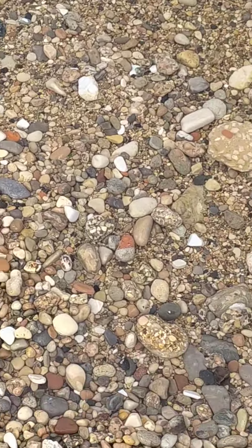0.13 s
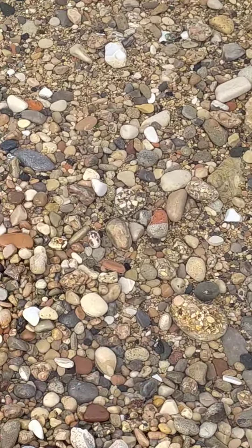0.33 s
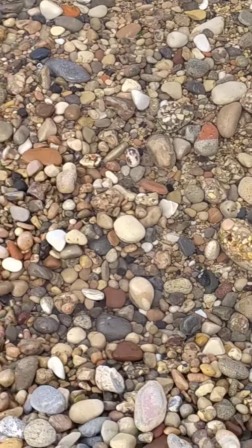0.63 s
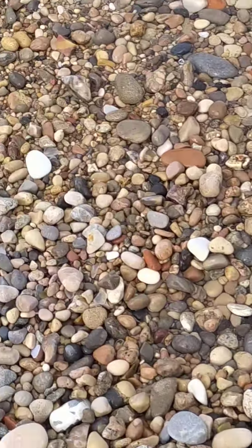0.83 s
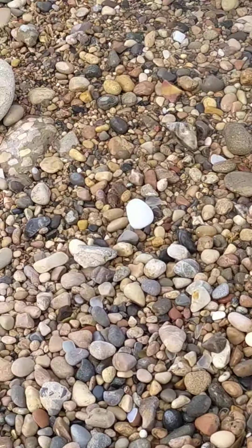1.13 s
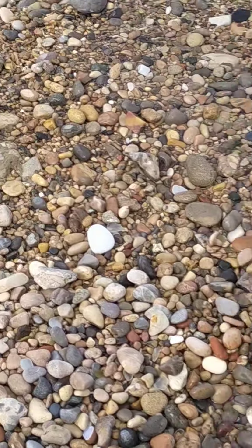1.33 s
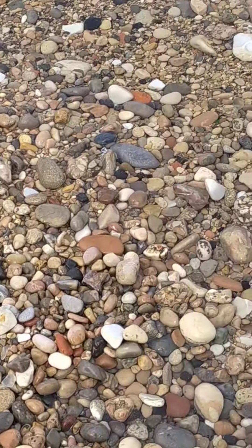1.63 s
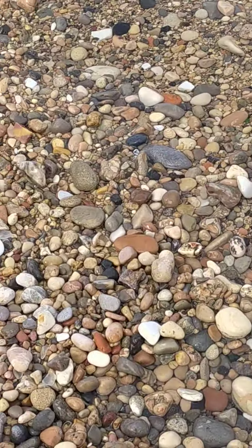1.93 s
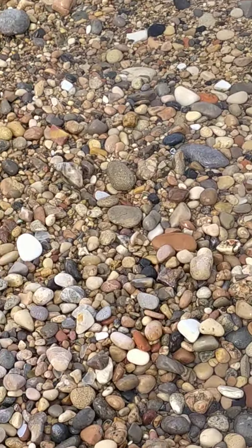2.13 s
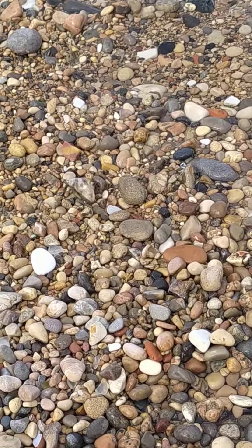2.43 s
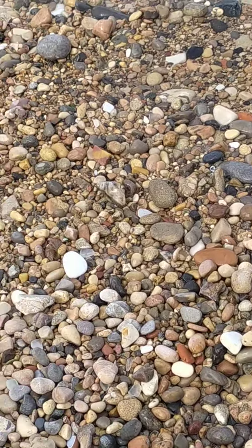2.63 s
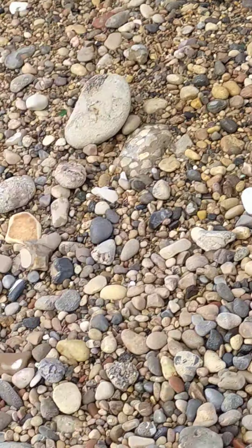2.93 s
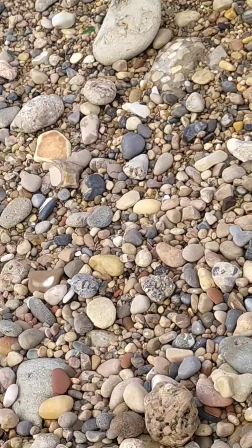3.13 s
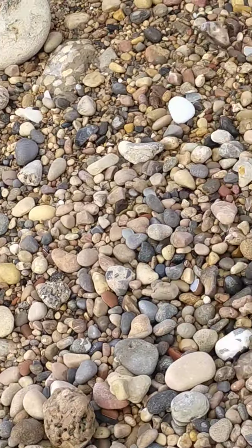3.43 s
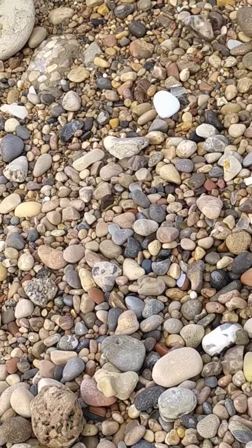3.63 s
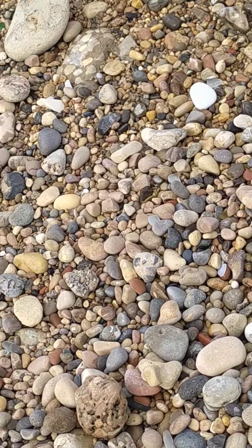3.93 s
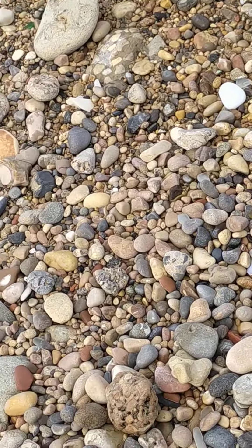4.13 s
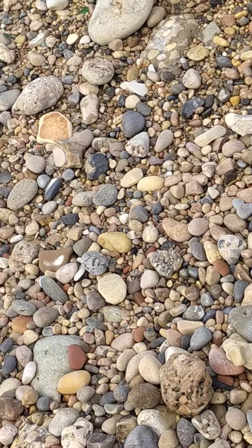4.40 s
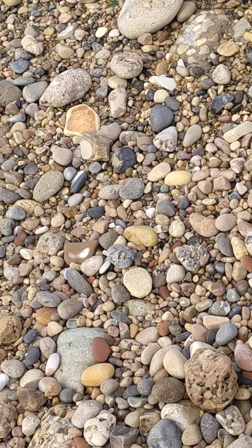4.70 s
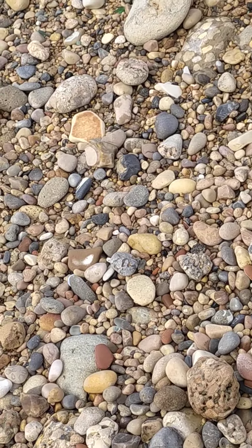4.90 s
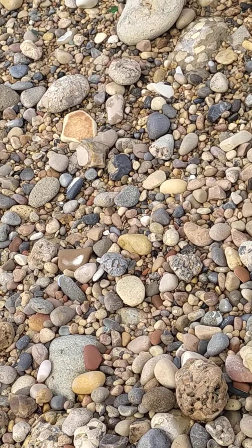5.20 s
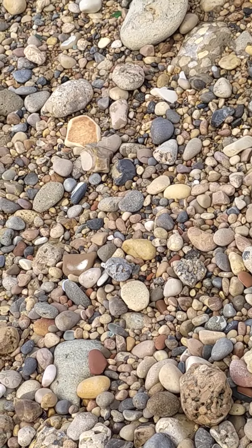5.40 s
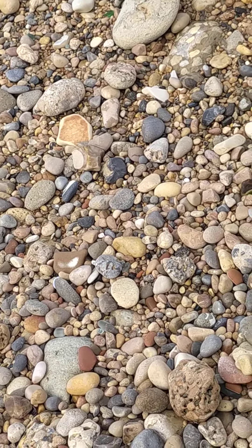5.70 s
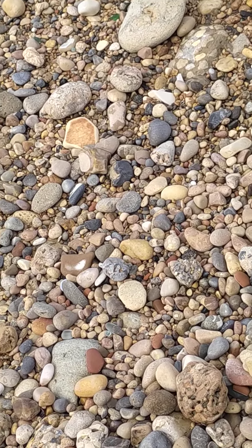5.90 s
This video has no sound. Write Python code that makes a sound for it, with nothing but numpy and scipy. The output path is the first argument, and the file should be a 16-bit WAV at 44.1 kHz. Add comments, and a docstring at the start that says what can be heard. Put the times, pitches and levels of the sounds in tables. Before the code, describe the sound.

On an open pebble beach, small wavelets slap and gurgle softly to the left while a few pebbles tick. Then a slow step crunches hard through loose stones, followed by a second with hollow knocks and scattering pebbles. Water plops quietly again before another short crunch and a faint last shuffle. Close, dry stereo pickup with a low airy rumble behind.

```python
"""Pebbles large and small clack and tick on a beach, through three slow steps and a few shuffles.
Fine gravel crunches under the shoe as crowds of tiny contacts, and big stones knock with a hollow ring.
Wavelets lap and fizz a little to the left: ringing bubbles, foam pops and short splashes of noise.
Behind them lie a low rumble of open air and water (filtered noise) and one faint gliding cry."""
import sys
import numpy as np
from scipy import signal
from scipy.fft import rfft, irfft, next_fast_len
from scipy.io import wavfile
from scipy.ndimage import uniform_filter1d

SR = 44100
rng = np.random.default_rng(int(sys.argv[2]) if len(sys.argv) > 2 else 0)


def master(y):
    """Save y as 16-bit WAV."""
    cut = np.clip(np.atleast_2d(y).T, -1, 1)
    pcm = np.round(cut * 32767)  # scale
    wavfile.write(sys.argv[1], SR, pcm.astype(np.int16))


N = 266981

# tone colour of water rocking in deep hollows: pitch_hz [Hz], density_db [relative dB per Hz]
SLOSH_COLOUR = [(90, -21), (135, -19), (170, 1.5), (215, -3.5), (300, 0.5), (500, 3.5), (750, -5),
                (1200, -41), (3000, -69)]


def from_db(db):
    """Turn decibels into a gain."""
    return 10 ** (np.asarray(db) / 20)


def rms_one(x):
    """Scale to an rms (average strength) of 1."""
    return x / np.sqrt(np.mean(x ** 2) + 1e-20)


def in_time(rows):
    """Read each column of a time curve at every sample, with straight lines between its points."""
    s, *columns = np.transpose(rows)
    return [np.interp(np.arange(N) / SR, s, column) for column in columns]


def at_hz(points, hz):
    """Read a spectrum on a log-frequency axis."""
    known_hz, values = np.transpose(points)
    return np.interp(np.log(np.maximum(hz, 1)), np.log(known_hz), values)


def panned(left_db):
    """Gains of the two channels, left minus right in dB, with a mean power of 1."""
    return rms_one(from_db([[left_db / 2], [-left_db / 2]]))


def colour(x, spectrum, extra_db=lambda hz: 0):
    """Filter with the given spectrum, without any ringing ahead of the sound (minimum phase)."""
    size = next_fast_len(x.shape[-1])
    size += size % 2
    hz = np.arange(size // 2 + 1) * SR / size
    cepstrum = irfft(np.log(from_db(at_hz(spectrum, hz) + extra_db(hz))))
    # fold the second half onto the first, so that the filter only looks back
    cepstrum[1:size // 2] *= 2
    cepstrum[size // 2 + 1:] = 0
    response = np.exp(rfft(cepstrum))
    return irfft(rfft(x, size) * response)[..., :x.shape[-1]]


def evened(x, window_s):
    """Hold the running level near 1, leaving grains shorter than the window their shape."""
    power = uniform_filter1d(np.mean(x ** 2, axis=0), max(int(window_s * SR), 2))
    return x / np.sqrt(np.maximum(power, 0) + np.mean(power) / 1000)


def add(out, s, sound):
    """Mix a sound in at time s."""
    i = int(np.clip(round(s * SR), 0, N - 1))
    out[:, i:i + sound.shape[1]] += sound[:, :N - i]


def grains(per_s, spread_db, shapes):
    """Random arrivals of random size, each with one of the given shapes."""
    out = np.zeros((2, N))
    at = np.flatnonzero(rng.random(N) < per_s / SR)
    sizes_db = spread_db * np.minimum(rng.exponential(1, len(at)), 4)
    sizes = from_db(sizes_db) * rng.choice([-1, 1], len(at))
    for i, size, k in zip(at, sizes, rng.integers(0, len(shapes), len(at))):
        add(out, i / SR, size * shapes[k])
    return out


def peak(hz, centre_hz, width_hz):
    """Bell of height 1 around a resonance."""
    return 1 / (1 + ((hz - centre_hz) / width_hz) ** 2)


def lows_share(hz, corner_hz=6000):
    """The part of the spectrum, below the corner, that grows with the size of a stone."""
    return 1 / (1 + (hz / corner_hz) ** 8)


def bubble(hz, cycles=4.0, rise=0.13, lag_s=0.00037):
    """A pocket of air rings for a few cycles (in water it rises in pitch); the right side hears it later."""
    right_lag_s = lag_s * rng.uniform(.6, 1.4)
    t = np.maximum(np.arange(2048) / SR - np.array([[0], [right_lag_s]]), 0)
    age = t * hz / cycles
    return np.sin(2 * np.pi * hz * t * (1 + rise * np.tanh(age / 2))) * np.exp(-age)


def contact(lag_s, attack_s=.0001, hold_s=.0004, ring_s=.0007, tail_db=-14.0, tail_s=0.0022,
            rebound_db=-11.5, alike=0.53):
    """A stone bites, cracks and rebounds; its neighbours scatter each crack into a short, dying burst."""
    t = np.arange(1024) / SR
    shared, own = rng.standard_normal((2, 2, len(t)))
    scatter = np.sqrt(alike) * shared[0] + np.sqrt(1 - alike) * own
    crack = np.exp(-np.maximum(t - hold_s * rng.uniform(0.41, 1.7), 0) / ring_s)
    rebound_gain = from_db(rebound_db + rng.normal(0, 6.0))
    rebound = rebound_gain * np.interp(t - rng.uniform(0.0023, 0.0049), t, crack, left=0)
    tail = from_db(tail_db) * np.exp(-t / tail_s)
    bite = np.minimum(t / attack_s, 1) ** 2
    sound = scatter * bite * np.sqrt(crack ** 2 + rebound ** 2 + tail ** 2)
    # a stone on the left reaches the right side lag_s later; each lies at a slightly different angle
    lag = int(round((lag_s + rng.normal(0, .00004)) * SR))
    late = int(lag > 0)
    sound[late] = np.pad(sound[late], (abs(lag), 0))[:len(t)]
    return sound


def clack(bulk_db, sharp_db, ring_hz, left_db, edge_hz=11300, stone_ring_db=7.5, lag_s_per_db=.00003):
    """A dry clack, coloured by stone bulk, contact hardness, the gap between stones and their brief ringing."""
    # an average clack: pitch_hz [Hz], density_db [relative dB per Hz]
    stone_colour = [(300, -44.5), (700, -23), (1200, -23), (1800, -20), (2400, -15), (2900, -17.5),
                    (3400, -17), (4200, -14), (5000, -12.5), (6800, -3.5), (8000, -2.5), (9300, 2),
                    (10300, -1.5), (11800, -10.5), (14000, -15), (16000, -25.5)]
    burst = contact(lag_s_per_db * left_db, attack_s=.0012, hold_s=.0012, ring_s=0.00067,
                    tail_db=-14.5, rebound_db=-15.0)
    stones_hz = rng.uniform(2500, 11984, size=8)

    def character_db(hz):
        """Change the average colour for these stones."""
        bulk = bulk_db * lows_share(hz)
        hardness = sharp_db * (1 - lows_share(hz, edge_hz))
        gap_ring = 7 * peak(hz, ring_hz, width_hz=450)
        stone_rings = np.max([peak(hz, stone_hz, width_hz=110) for stone_hz in stones_hz], axis=0)
        return bulk + hardness + gap_ring + stone_ring_db * stone_rings

    sound = colour(burst, stone_colour, character_db)
    # give each side the energy of 2 ms at rms 1
    energy = np.sum(sound ** 2, axis=1, keepdims=True)
    return panned(left_db) * sound / np.sqrt(energy / (SR / 500))


def open_air(level_db=-54.0):
    """Steady rumble of air and water, alike on both sides in the bass."""
    # pitch_hz [Hz], left_right_likeness [-1 opposite to 1 the same]
    likeness = [(30, 0.73), (150, 0.97), (300, 0.8), (600, 0.82), (1200, -0.38), (3000, -0.19),
                (15000, -0.86)]
    # pitch_hz [Hz], density_db [relative dB per Hz]
    rumble_colour = [(12, -14.5), (25, 3), (60, -0.5), (90, -5.5), (120, -9), (165, -5.5), (260, -10.5),
                     (500, -16), (1000, -13), (2200, -23.5), (3500, -30.5), (6000, -45), (9500, -51),
                     (12500, -51)]
    mid, side = rfft(rng.standard_normal((2, 2 * N)))
    alike = np.clip(at_hz(likeness, np.arange(N + 1) * SR / (2 * N)), -1, 1)
    pair = irfft(np.sqrt(1 + alike) * mid + np.sqrt(1 - alike) * side * [[1], [-1]])[:, :N]
    return from_db(level_db) * rms_one(colour(pair, rumble_colour))


def gull():
    """One faint falling cry, perhaps a far gull: a thin, pure tone that glides."""
    # time_s [s], pitch_hz [Hz], level_db [dB, rms]
    cry = [(1.98, 1430, -71), (2.07, 1377, -64), (2.13, 1260, -77), (2.2, 1146, -56), (2.25, 1026, -80)]
    hz, db = in_time(cry)
    t = np.arange(N) / SR
    calling = (t > cry[0][0]) & (t < cry[-1][0])
    return np.sqrt(2) * from_db(db) * calling * np.sin(2 * np.pi * np.cumsum(hz) / SR)


def surges(rise_s=0.015, fall_s=0.039):
    """Most wavelets lift the water's level quickly and drain more slowly; one brings a slight dip; in dB."""
    # wavelets running up the stones: centre_s [s], surge_db [dB, below 0 for a dip]
    run_ups = [(0.65, 1), (0.932, 7), (1.091, 8.5), (1.317, 3), (1.43, 3), (1.759, 3), (2.86, 7.5),
               (4.29, -1), (4.74, 1.5)]
    t = np.arange(N) / SR
    return sum(db * np.exp(-((t - s) / np.where(t < s, rise_s, fall_s)) ** 2) for s, db in run_ups)


def wavelets(lap_gain_db=-2.5, drip_db=-3.5, surge_slosh_share=0.62):
    """Water moves among the stones: big pockets gulp, bubbles ring, and foam fizzes as pops and hiss."""
    # slow wash: time_s [s], bubbling_db [dB before the lap gain and surges], foam_db [dB before surges]
    wash = [(0.0, -56, -49.5), (0.055, -47.5, -42.5), (0.13, -46.5, -42.5), (0.155, -52, -54),
            (0.25, -61, -60), (0.42, -58, -55), (0.8, -50.5, -46), (1.02, -50.5, -51.5),
            (1.5, -47.5, -52.5), (1.97, -53.5, -56.5), (2.85, -50, -54), (3.0, -54.5, -58),
            (3.4, -53.5, -51), (3.72, -57, -65.5), (3.82, -56.5, -56), (4.3, -50.5, -53.5),
            (4.58, -56, -65), (4.78, -52, -50), (5.2, -63.5, -69.5), (5.58, -61.5, -72.5), (5.7, -58, -58),
            (5.8, -62.5, -55), (5.87, -63, -63.5), (6.05, -56, -59)]
    # water rocking in the deep hollows: time_s [s], level_db [dB before surges]
    sloshing = [(0.1, -54), (0.35, -60), (0.65, -60), (0.9, -54), (1.03, -57), (1.25, -57), (1.9, -59.5),
                (2.4, -55.5), (2.9, -60), (3.5, -67.5), (4.0, -66), (4.3, -58.5), (4.55, -64.5),
                (4.75, -56), (5.1, -61), (6.05, -66.5)]
    # colours of bubbling and of foam: pitch_hz [Hz], density_db [relative dB per Hz]
    lap_colour = [(300, -3.5), (700, -6), (1000, -7), (1300, 3.5), (1900, 2), (2600, 0), (3400, -11),
                  (5000, -11), (9000, -33)]
    fizz_colour = [(1500, -6), (3500, -5), (5000, -5.5), (7000, -2), (9400, 3.5), (10500, 1), (12000, -12),
                   (16000, -21.5)]
    wash_db, foam_db = in_time(wash)
    surge_db = surges()
    lap_db, fizz_db = wash_db + surge_db, foam_db + surge_db
    slosh_db = in_time(sloshing)[0] + surge_slosh_share * surge_db

    pockets = grains(900, 4.35, [bubble(hz, cycles=1.9) for hz in np.geomspace(140, 900, 40)])
    slosh = from_db(slosh_db) * evened(colour(pockets, SLOSH_COLOUR), 0.034) * panned(1.0)

    ringing = [bubble(hz, cycles=4.2) * np.sqrt(hz) for hz in np.geomspace(600, 5000, 80)]
    bubbles = grains(1400, 1.9, ringing)
    lap = from_db(lap_db + lap_gain_db) * evened(colour(bubbles, lap_colour), 0.13) * panned(4.7)

    pops = [contact(0.00034, ring_s=0.00098) for _ in range(40)]
    foam = rms_one(grains(3500, 6.6, pops))
    drips = from_db(drip_db) * rms_one(grains(70, 1.2, pops))
    hiss = rng.standard_normal((2, N))
    spray = foam + drips + hiss
    fizz = from_db(fizz_db) * evened(colour(spray, fizz_colour), 0.068) * panned(4.5)
    return slosh + lap + fizz


def slaps(splash_db=1.5, gulp_gain_db=3.0, churn_db=-5.5, splash_s=0.0044, churn_s=0.0028, churn_top_hz=600):
    """A wavelet closes on a gap: a short splash, one ringing bubble and the hollow's low, churning gulp."""
    # water slapping into gaps: start_s [s], level_db [dB before splash gain and panning],
    # bubble_hz [Hz], gulp_db [dB before the gulp gain], gulp_hz [Hz]
    gap_slaps = [(0.649, -38.5, 920, -41, 367), (0.6532, -32, 2360, -40, 292), (0.745, -39, 1130, -50, 190),
                 (0.785, -44, 1700, -51, 450), (0.877, -46, 1600, -57, 550), (0.8214, -45, 1900, -43, 430),
                 (0.9213, -32.5, 2600, -53, 480), (0.9286, -38.5, 1970, -44, 560),
                 (0.9608, -40, 1940, -39, 590), (0.967, -49, 910, -36.5, 474), (1.074, -36, 1380, -35, 514),
                 (1.095, -41, 2280, -57, 450), (1.1236, -37, 1970, -39, 497), (1.201, -44, 1540, -45, 450),
                 (1.285, -41.5, 2000, -54, 447), (1.311, -42, 1260, -56, 400),
                 (1.3208, -37, 1640, -51, 400), (1.326, -47, 1700, -59, 400), (1.34, -44, 1920, -58, 500),
                 (1.4, -44, 1750, -62, 452), (1.447, -40, 1300, -49, 450), (1.4201, -37.5, 1500, -44, 352),
                 (1.4733, -37, 1320, -60, 450), (1.769, -33.5, 1295, -48, 456),
                 (2.1168, -35, 1280, -62, 400), (3.891, -43.5, 1360, -56, 258),
                 (4.0123, -39.5, 1590, -62, 596), (4.0919, -35, 1660, -48, 623),
                 (4.1888, -33.5, 1660, -52, 785), (4.2168, -38, 1450, -49, 550),
                 (4.2442, -41, 1160, -34.5, 724), (4.274, -39.5, 1770, -43.5, 392),
                 (4.2936, -32, 1750, -40, 547), (4.306, -34.5, 1875, -40.5, 513),
                 (4.3936, -34.5, 2620, -46, 757), (4.566, -36.5, 1493, -55, 452)]
    # splash: pitch_hz [Hz], density_db [relative dB per Hz]
    splash_colour = [(300, -9), (600, 5), (900, -2.5), (1400, 4.5), (1900, 5.5), (2600, -1), (3500, -9),
                     (5000, -6.5), (9000, -2.5), (14000, -33)]
    out = np.zeros((2, N))
    for s, db, hz, low_db, gulp_hz in gap_slaps:
        plip = bubble(hz, cycles=9.0, rise=0.0079)
        t = np.arange(plip.shape[1]) / SR
        noise = rng.standard_normal((3, len(t)))
        swell = (1 - np.exp(-t / 0.0006)) * (1 - t / t[-1])
        splash = rms_one(colour(noise[:2], splash_colour)) * swell * np.exp(-t / splash_s)
        low_pass = signal.butter(4, churn_top_hz, fs=SR, output="sos")
        churn = rms_one(signal.sosfilt(low_pass, colour(noise[2], SLOSH_COLOUR))) * np.exp(-t / churn_s)
        gulp = swell * (bubble(gulp_hz, cycles=1.9, rise=0.081) + from_db(churn_db) * churn)
        slap = from_db(db) * (from_db(splash_db) * splash + plip) * panned(5.5)
        add(out, s, slap + from_db(low_db + gulp_gain_db) * gulp)
    return out


def backwash(per_s=32, left_db=5.5):
    """Tiny stones tick against each other as the water drains between them."""
    # draining water rolls loose grit: start_s [s], length_s [s], tick_db [dB]
    drains = [(0.176, 0.64, -54.5), (1.454, 0.42, -39), (3.83, .6, -44.5)]
    out = np.zeros((2, N))
    for s, length_s, db in drains:
        for share, pitch in rng.random((int(per_s * length_s), 2)):
            tick = clack(0, 0, 7000 + 4000 * pitch, left_db)
            add(out, s + share * length_s, from_db(db) * tick)
    return out


def pressure(release_db_per_s, attack_s=.022, sag_db_per_s=25):
    """Load, bulk and knock in dB: each press builds quickly, sags as the stones lock, and lets go."""
    # the shoe presses or scuffs: full_load_s [s], length_s [s], level_db [dB before sag and release],
    # bulk_db [dB of extra lows as bigger stones move], knock_db [dB of big stones rocking underneath]
    presses = [(0.055, 0.049, -46.5, 2, -9), (2.093, 0.032, -40.5, 9, -13.5), (2.227, 0.048, -34.5, 5, -31),
               (2.31, 0.12, -26.5, 2, -33), (2.52, 0.0037, -32.5, 7.5, -35), (2.55, 0.027, -30, 3.5, -45),
               (2.677, 0.12, -41.5, 1, -13), (2.77, 0.0035, -36, 2, -25), (3.04, 0.015, -42, 9.5, -15),
               (3.071, 0.069, -27.5, 5.5, -15.5), (3.16, 0.056, -30.5, 5.5, -12.5),
               (3.237, 0.034, -32, 4, -14), (3.306, 0.018, -45, 12, -20), (3.373, 0.026, -47.5, 10.5, -13),
               (3.57, 0.11, -52, 11, -15), (4.6, 0.015, -51, 7, -25), (4.798, 0.046, -35, 6.5, -30),
               (4.889, 0.043, -33, 3, -28), (4.969, 0.015, -37, 7, -33), (5.62, 0.012, -51, 6, -26),
               (5.684, 0.012, -42, 7, -21), (5.744, 0.065, -38.5, 6, -22), (5.916, 0.01, -49.5, 7.5, -26)]
    t = np.arange(N) / SR
    loads = []
    for s, length_s, db, *_ in presses:
        sag_db = sag_db_per_s * np.clip(t - s, 0, length_s)
        release_db = release_db_per_s * np.clip(t - s - length_s, 0, 2)
        build_up = np.clip(1 + (t - s) / attack_s, 0, 1) ** 2
        loads.append(from_db(db - sag_db - release_db) * build_up)
    loads = np.array(loads) + 1e-9
    # presses that overlap share bulk and knock by their load
    bulk_db, knock_db = np.transpose(presses)[3:] @ loads / loads.sum(axis=0)
    return 20 * np.log10(loads.max(axis=0)), bulk_db, knock_db


# how fast the shoe lets go of the bed
PRESS_RELEASE_DB_PER_S = 280


def gravel(lows_db=-9.5, rest_db=-70.0, slip_db=5.5, slips_per_s=120, ring_db=25.0, split_hz=5800):
    """Small stones slip in crowds: the harder the shoe presses, the more contacts a second."""
    # where the moving shoe is: time_s [s], left_db [dB, left minus right]
    shoe_place = [(0, -11), (2.3, 3), (2.8, -0.5), (3.1, 1), (4.8, 1), (5.7, 2)]
    # fine stones: pitch_hz [Hz], density_db [relative dB per Hz]
    grit_colour = [(300, -38), (700, -10), (1300, -30), (2300, -7.5), (3000, -7), (5000, 6), (6800, -3.5),
                   (8000, -1), (9300, 1), (10300, -3), (11800, -11), (14000, -20.5), (16000, -45.5)]
    db, bulk_db, knock_db = pressure(PRESS_RELEASE_DB_PER_S)
    left_db, = in_time(shoe_place)
    per_s = 2000 * from_db(.35 * (db + 30)) + 150
    stones = []
    for ring_hz in np.geomspace(1900, 14500, 90):
        touch = contact(rng.uniform(-0.000088, .00024), hold_s=.00005, ring_s=0.000074,
                        tail_db=-42.0, rebound_db=-12.0)
        ringing = colour(touch, grit_colour, lambda hz: ring_db * peak(hz, ring_hz, width_hz=69))
        stones.append(ringing * panned(rng.normal(0, 5.0)))
    # the bed sticks and slips, so the contacts swell and fade in clumps
    slips = np.interp(np.arange(N) / SR * slips_per_s, np.arange(N), rng.standard_normal(N))
    crunch = grains(per_s, 1.3, stones) * from_db(slip_db * slips)
    lows = signal.sosfilt(signal.butter(6, split_hz, fs=SR, output="sos"), crunch)
    highs = signal.sosfilt(signal.butter(6, split_hz, "high", fs=SR, output="sos"), crunch)
    # under too light a load the stones lie still
    moving = np.maximum(from_db(db) - from_db(rest_db), 0)
    sides = from_db(np.array([left_db, -left_db]) / 2)
    # the biggest stones rock underneath and set the hollows between them ringing
    hollows = [bubble(hz, cycles=4.0, rise=0, lag_s=.00008) * np.sqrt(hz) for hz in np.geomspace(880, 2600, 36)]
    knocks = from_db(knock_db) * evened(grains(1600, 1.5, hollows), 0.011)
    bulk = from_db(bulk_db + lows_db) * evened(lows, 0.019)
    return moving * sides * (evened(highs, 0.018) + bulk + knocks)


def settling(per_s=45, level_db=-5.5, spread_db=4.0, bulk_db=6.5, sharp_db=-20.0, left_db=1.5, rest_db=-51.5,
             settle_db_per_s=42.5, after_press_drop_db=10):
    """Smaller pebbles topple at random during each press, and ever more softly after it."""
    out = np.zeros((2, N))
    lingering_db = pressure(settle_db_per_s)[0]
    pressed_db = pressure(PRESS_RELEASE_DB_PER_S)[0]
    # once the shoe lets go, the slower and softer stir takes over
    stir_db = np.maximum(pressed_db, lingering_db - after_press_drop_db)
    for i in np.flatnonzero((rng.random(N) < per_s / SR) & (stir_db > rest_db)):
        size, bulk, sharp, side = rng.standard_normal(4)
        ring_hz = rng.uniform(3500, 10500)
        sound = clack(bulk_db + 6 * bulk, sharp_db + 6 * sharp, ring_hz, left_db + 3 * side)
        add(out, i / SR, from_db(stir_db[i] + level_db + spread_db * size) * sound)
    return out


def cobbles(ring_s=0.0044, neighbours_db=-11.5, neighbour_cycles=2.5):
    """Big stones knock under the heel; one hollow rings clearly and a few others briefly."""
    # start_s [s], level_db [dB of the main ring], ring_hz [Hz]
    heel_knocks = [(3.076, -33, 1972), (3.106, -36, 2800), (3.13, -29.5, 1848), (3.147, -34, 2150),
                   (3.168, -30, 2020), (3.172, -27.5, 1340), (3.199, -32, 1900), (3.204, -22.5, 3400),
                   (3.214, -30.5, 1920), (3.243, -37, 3200), (3.28, -33, 3390), (4.785, -27.5, 2470)]
    out = np.zeros((2, N))
    for s, db, hz in heel_knocks:
        hollow = bubble(hz, cycles=hz * ring_s, rise=0, lag_s=.00005)
        others = sum(bubble(other_hz, cycles=neighbour_cycles, rise=0, lag_s=.00007) * rng.choice([-1, 1])
                     for other_hz in rng.uniform(780, 3360, size=3))
        add(out, s, from_db(db) * (hollow + from_db(neighbours_db) * others))
    return out


def pebbles(level_db=-3.5, usual_lows_db=-21, usual_top_db=-24.5, delay_s=.0003,
            rebound_s=0.0066, rebound_spread_s=0.017, rebound_db=-20):
    """Pebbles large and small clack or tick, shoved by the shoe, dropping back or rolled by draining water."""
    # the clearest strikes: strike_s [s, before the short delay], strike_db [dB before the overall level],
    # lows_db and top_db [dB, set against the usual pebble], gap_ring_hz [Hz], left_db [dB, left minus right]
    strikes = [(0.06, -22, -38, -20, 8450, 4), (0.1765, -33.5, -43, -15, 8640, 2.5),
               (0.255, -40.5, -24, -22, 9000, 6.5), (0.3187, -42.5, -18, -28, 7000, 1),
               (0.5213, -34, -20, -20, 9200, 5.5), (0.6175, -32.5, -27, -17, 9000, 4.5),
               (0.916, -26.5, -30, -18, 9100, 13.5), (0.931, -29, -22, -22, 9200, 5.5),
               (1.071, -29, -6, -20, 7000, 6), (1.084, -34, -16, -24, 9000, 5),
               (1.446, -39, -16, -18, 9600, 7), (1.502, -36, -35, -20, 9280, 8),
               (1.569, -34.5, -7, -29, 9750, 4.5), (2.0352, -32, -18, -2, 10100, 8),
               (2.0913, -24.5, -12, -25, 9500, 2.5), (2.153, -25, -16, -20, 10400, 4.5),
               (2.2032, -21, -11, -35, 8800, 4.5), (2.228, -23, -29, -24, 9000, 3.5),
               (2.2336, -19.5, -37, -33, 8300, 1.5), (2.245, -19, -37, -33, 9300, 7),
               (2.254, -18.5, -30, -30, 8400, 3.5), (2.269, -21, -21, -28, 9300, 4),
               (2.2879, -16.5, -13.5, -27, 9300, 1), (2.314, -21, -29, -10, 9200, 1),
               (2.3215, -19, -24, -18, 10000, 2), (2.328, -21, -25, -21, 9200, 3),
               (2.335, -16, -18, -4, 8900, 6), (2.358, -15.5, -42, -12, 10300, 5),
               (2.376, -17, -38, -7, 10300, 1.5), (2.39, -16.5, -37, -13, 9690, 4.5),
               (2.4084, -15.5, -46, -13, 9500, 2.5), (2.432, -19.5, -40, -15, 10200, 5),
               (2.456, -16.5, -26, -39, 10400, 1.5), (2.487, -30, -17, -30, 9000, 2),
               (2.5065, -14.5, -38, -15, 8900, 12), (2.514, -16, -20, -16, 8890, 2.5),
               (2.5223, -16.5, -16.5, -13, 9640, 1), (2.527, -18, -15, -26, 9500, 9),
               (2.551, -12, -21, -32, 9900, 5.5), (2.563, -14.5, -29, -27, 9510, 6),
               (2.5723, -15, -42, -22, 9400, 3.5), (2.588, -25, -23, -28, 8740, 4),
               (2.596, -9.5, -24, -24, 8770, 6.5), (2.6045, -20, -36, -24, 6500, -3),
               (2.6125, -39, -34, -28, 9000, -8), (2.638, -13.5, -23.5, -30, 8610, 3.5),
               (2.6408, -21, -19, -28, 10400, 3), (2.6815, -14, -15.5, -19, 8600, 3.5),
               (2.691, -18.5, -14, -18, 9200, 4.5), (2.729, -18, -6, -20, 8490, 3),
               (2.747, -25.5, -8, -33, 5230, 1), (2.755, -32, -25, -34, 8960, 3),
               (2.7732, -15, -21.5, -37, 8680, 5.5), (2.856, -21, -32, -21, 9900, 6),
               (2.9792, -29.5, -11, -17, 9200, -0.5), (3.038, -27, -17, -38, 9000, -2),
               (3.057, -27, -11, -30, 8410, 2), (3.0756, -16.5, -15.5, -45, 8784, -0.5),
               (3.0818, -13, -19.5, -42, 9070, 0.5), (3.105, -21, -12, -23, 9680, 2),
               (3.128, -12, -16, -40, 7950, -4), (3.135, -22, -21, -26, 8490, -1.5),
               (3.146, -27, -3, -19, 9000, 3), (3.1665, -22, -9, -31, 5400, -8.5),
               (3.172, -25, -4, -32, 5500, -3.5), (3.18, -15, -9, -39, 5700, -2),
               (3.1992, -16, -8, -34, 5600, 1.5), (3.2039, -20, -13, -39, 7300, -0.5),
               (3.2144, -19.5, -15, -37, 8730, -1.5), (3.2312, -26, -13, -34, 9050, -5),
               (3.242, -16, -20, -51, 6700, 4), (3.246, -20, -25, -44, 6630, -1),
               (3.2513, -23, -14, -40, 8950, 4), (3.271, -26, -7, -42, 3610, 3),
               (3.2791, -18, -5, -40, 3340, 4), (3.288, -35, -8, -36, 4500, 10),
               (3.375, -30, -14, -40, 4770, 4), (3.3969, -25.5, -19, -48, 9800, 0),
               (3.4918, -31.5, -4, -19, 3120, 1.5), (3.5332, -29.5, -5, -30.5, 3140, 1.5),
               (3.575, -25.5, -8.5, -25, 8510, -3.5), (3.6204, -21.5, -14, -42, 9630, -0.5),
               (3.659, -27.5, -5.5, -59.5, 7100, 1), (3.6764, -34.5, 6, -41, 4470, 3.5),
               (3.7351, -33.5, -8, -35, 3070, 3), (3.761, -17.5, -21, -54, 6000, 1.5),
               (3.843, -40.5, -28, -20, 9400, 8), (3.9324, -40.5, -15, -18, 9200, 9),
               (4.001, -35.5, -24, -27, 9350, 6), (4.0184, -36, -24, -27, 9700, 3),
               (4.047, -35, -11, -24, 9200, 4.5), (4.071, -39, -24, -24, 9400, 6),
               (4.3797, -38, -21, -17, 10100, 7), (4.641, -32.5, -15, -30, 8880, 1),
               (4.669, -21, -5, 2.5, 10440, -1), (4.673, -22, -10, -13.5, 9500, 1.5),
               (4.777, -15, -16.5, -31, 9390, -2.5), (4.784, -17, -20, -34, 2440, 2),
               (4.788, -19, -10.5, -30, 9300, 2.5), (4.803, -37, -18.5, -26, 8790, 2.5),
               (4.816, -19, -19, -24, 8900, -0.5), (4.824, -18, -26, -29, 8450, -5),
               (4.8282, -10.5, -23, -27, 9420, -1.5), (4.832, -16.5, -19, -28, 9450, 1),
               (4.8497, -11, -24, -32, 9170, -2), (4.8769, -12, -19, -33, 9646, -1.5),
               (4.8867, -29, -22, -23, 9070, 2), (4.9062, -19.5, -15, -20, 9090, 4),
               (4.9232, -25.5, -7, -33, 7180, 1), (4.95, -24.5, -19, -32, 9770, 3.5),
               (4.966, -39, -27, -30, 8260, 3), (4.9745, -19, -22, -33, 9570, 1.5),
               (4.981, -19.5, -14, -37.5, 8730, 3.5), (5.011, -25.5, -21, -38, 9910, -1),
               (5.018, -28.5, -19, -39, 9970, -0.5), (5.087, -35, -30, -29, 9530, 0),
               (5.1493, -23, -32, -37, 9000, -0.5), (5.245, -33.5, -9, -37, 7040, 1),
               (5.288, -37, -14, -43, 8900, 2.5), (5.316, -19, -21, -58, 6260, -2.5),
               (5.372, -34, -16, -40, 7050, 1.5), (5.3973, -28, -14, -57, 6300, 2.5),
               (5.6354, -19.5, -16.5, -17, 9940, 1.5), (5.639, -29, -14, -22.5, 9020, 1.5),
               (5.673, -29, -10, -27.5, 6390, 1), (5.688, -34, -17.5, -22, 9290, 1),
               (5.7018, -24.5, -24, -40, 9120, 1), (5.764, -33, -22, -38, 8380, 6),
               (5.7871, -23.5, -22, -36.5, 9500, 3), (5.79, -25.5, -16, -42, 6460, 3.5),
               (5.797, -23, -13.5, -37.5, 4400, -4), (5.8034, -24, -18, -43, 6280, 0.5),
               (5.82, -33, -24, -32, 9300, 1.5), (5.8399, -27.5, -27, -19, 8300, 1),
               (5.853, -35, -24, -27, 9050, 2.5), (5.896, -39.5, -8, -41.5, 5950, 3.5),
               (6.0185, -35, -18, -34, 8000, 11), (6.028, -23, -16.5, -55, 8900, 5.5)]
    out = np.zeros((2, N))
    for s, db, lows_db, top_db, ring_hz, left_db in strikes:
        strike = clack(lows_db - usual_lows_db, top_db - usual_top_db, ring_hz, left_db)
        sound = from_db(db + level_db) * strike
        start_s = s + delay_s
        add(out, start_s, sound)
        # a struck pebble rocks and touches once more, softly
        add(out, start_s + rebound_s + rebound_spread_s * rng.random(), from_db(rebound_db) * sound)
    return out


def scene():
    """Steps and water in the open, without walls."""
    background = open_air() + gull()
    water = wavelets() + slaps() + backwash()
    stones = gravel() + settling() + cobbles() + pebbles()
    return background + water + stones


def record(dry):
    """Cut the top steeply above 16.1 kHz."""
    low_pass = signal.ellip(10, .2, 80, 16100, fs=SR, output="sos")
    return signal.sosfilt(low_pass, dry)


dry = scene()
out = record(dry)
master(out)
```